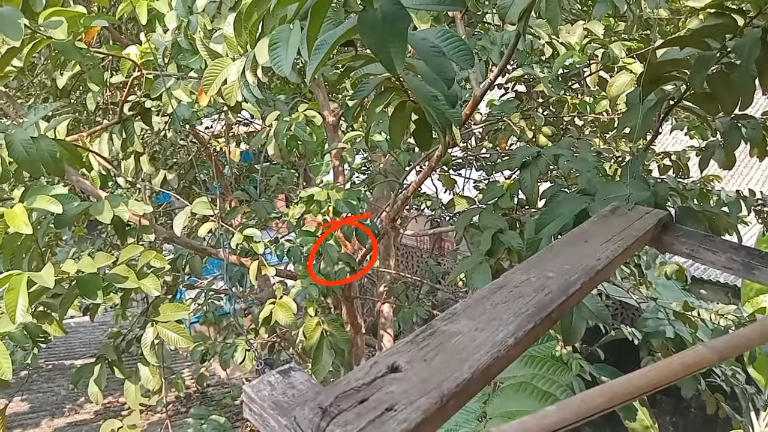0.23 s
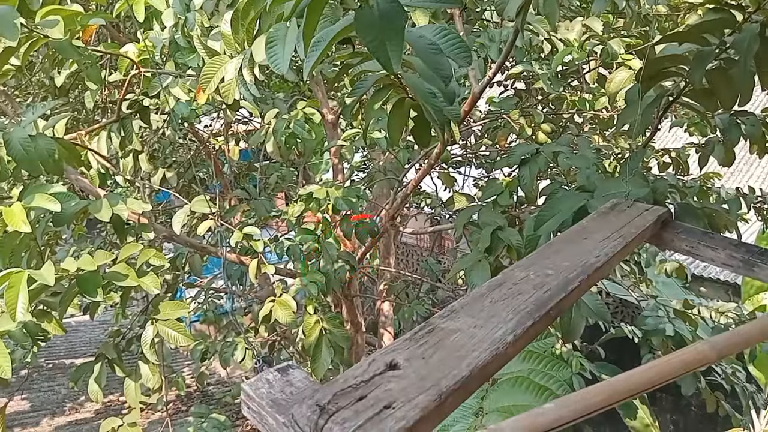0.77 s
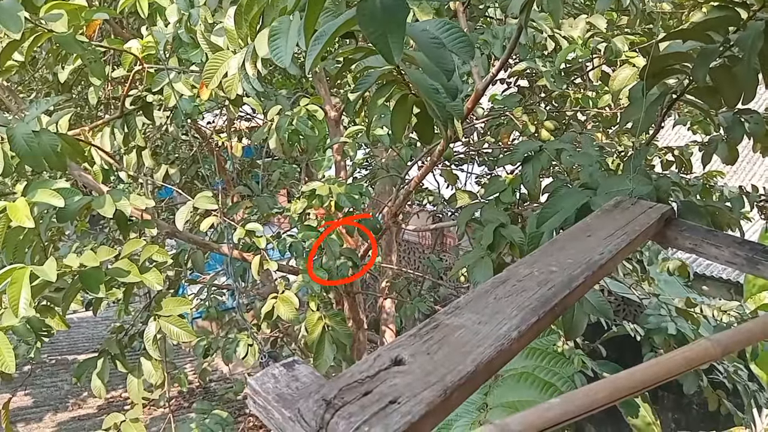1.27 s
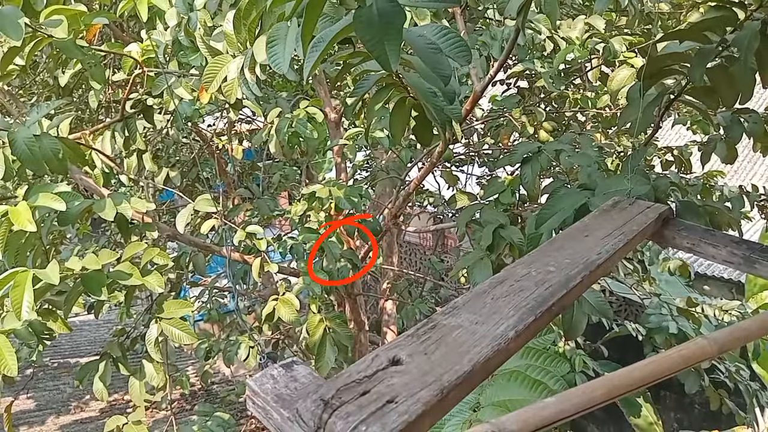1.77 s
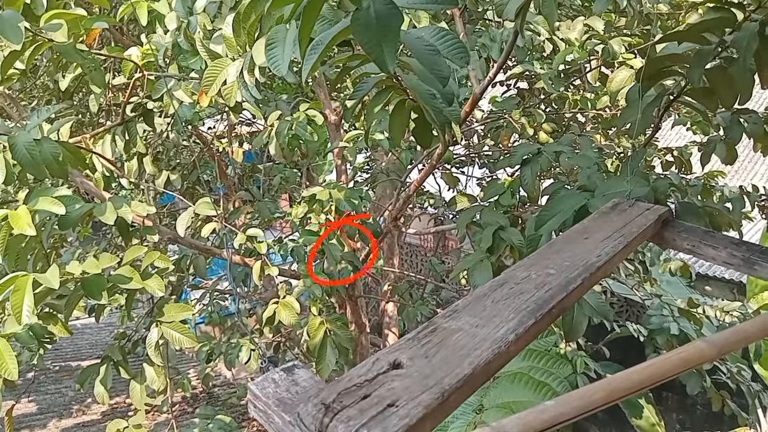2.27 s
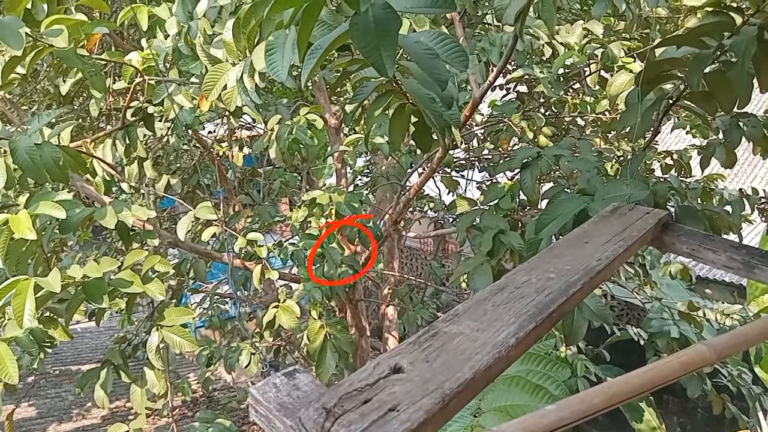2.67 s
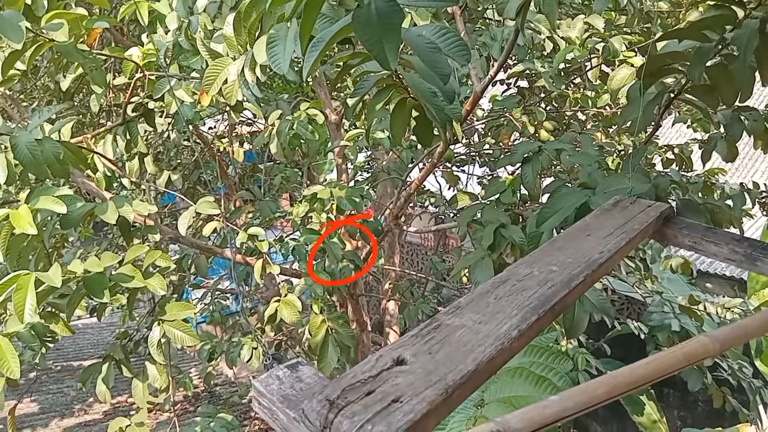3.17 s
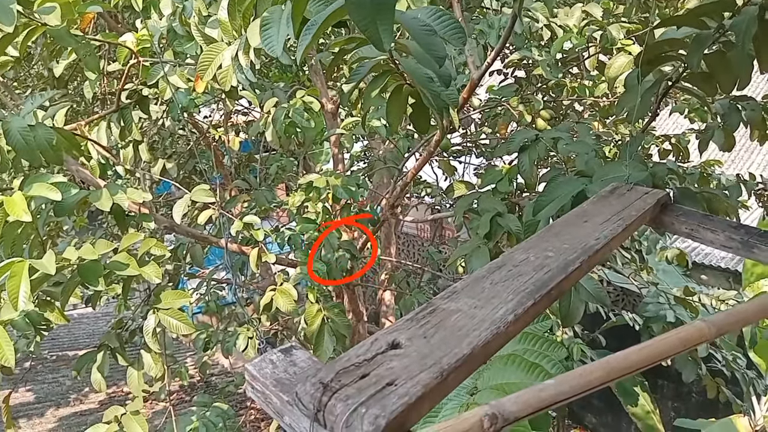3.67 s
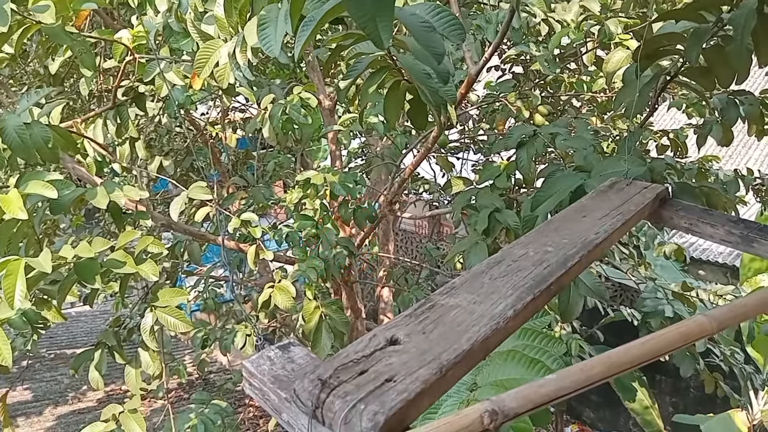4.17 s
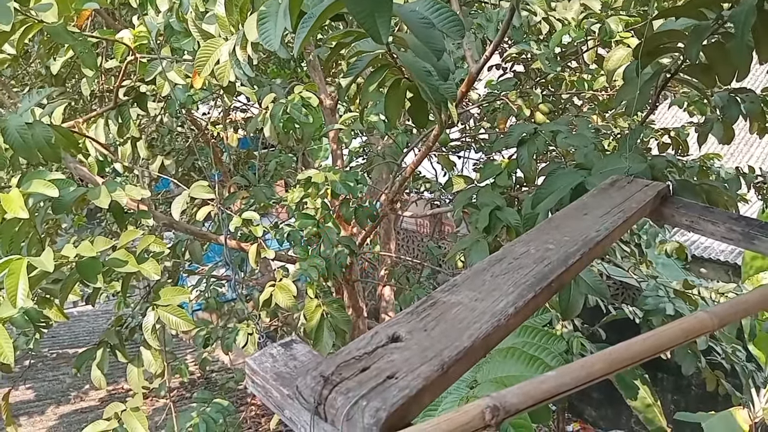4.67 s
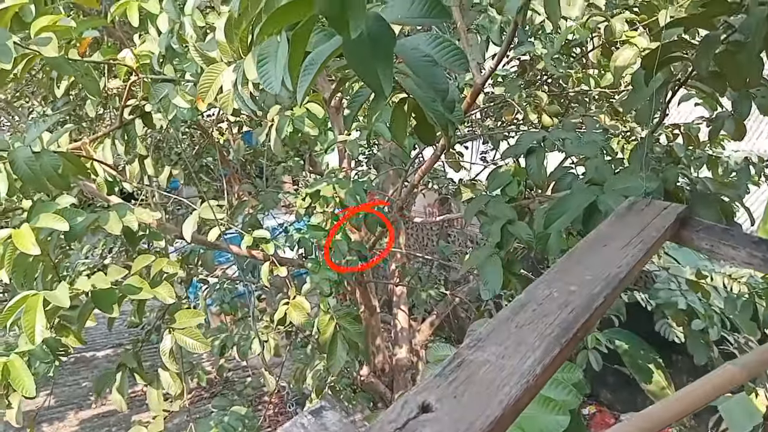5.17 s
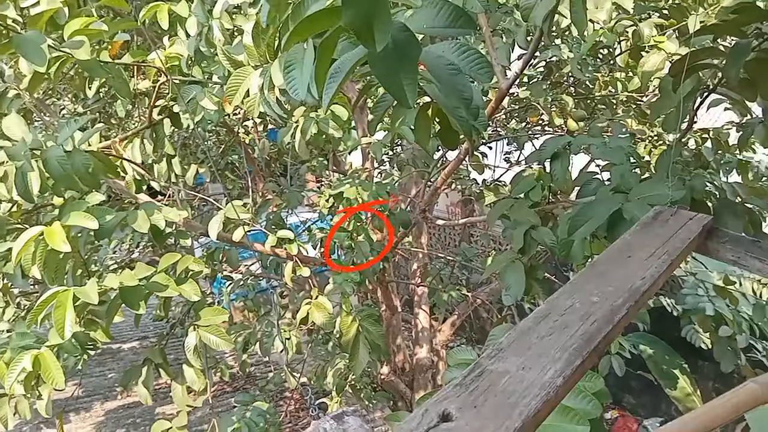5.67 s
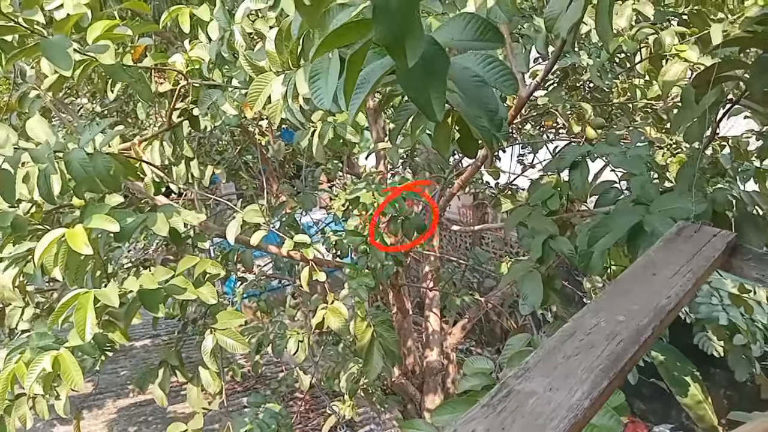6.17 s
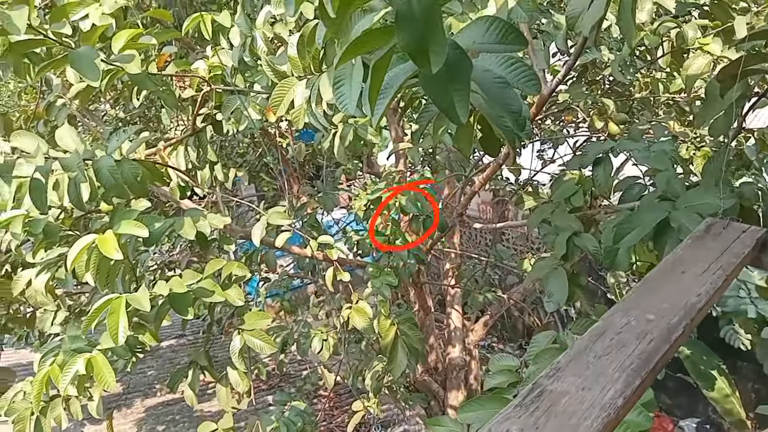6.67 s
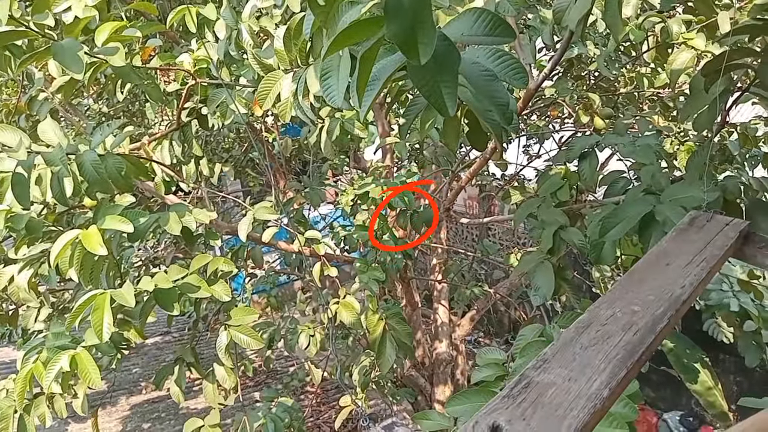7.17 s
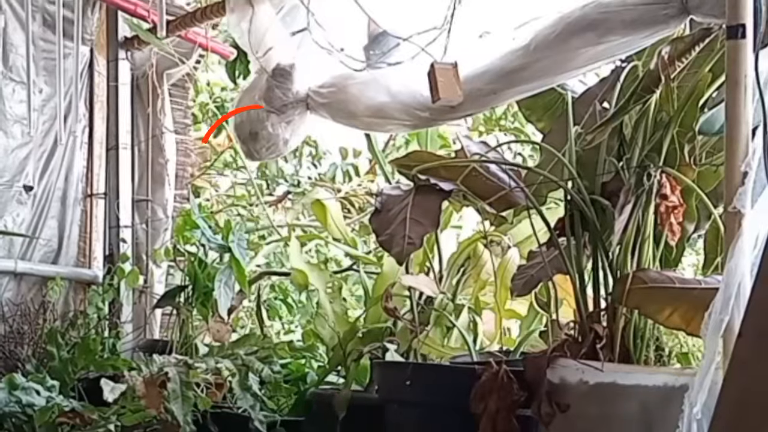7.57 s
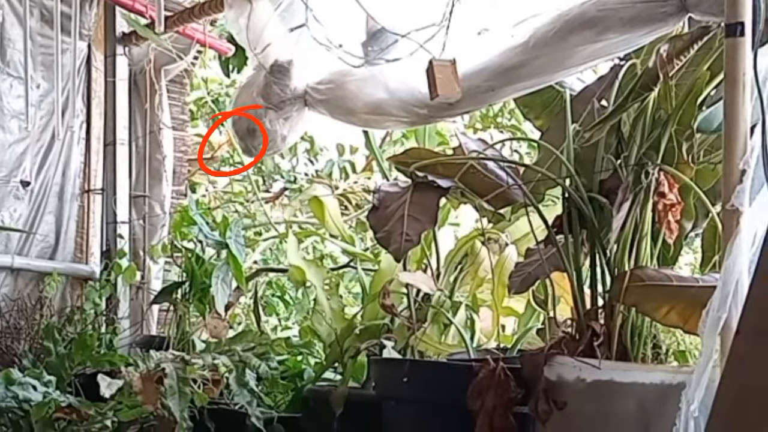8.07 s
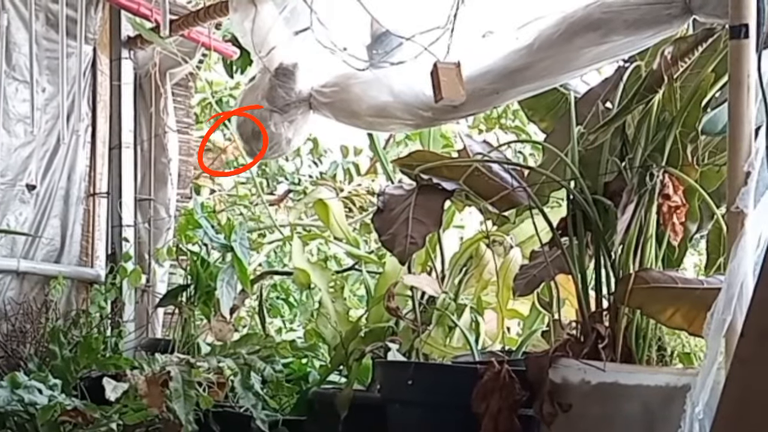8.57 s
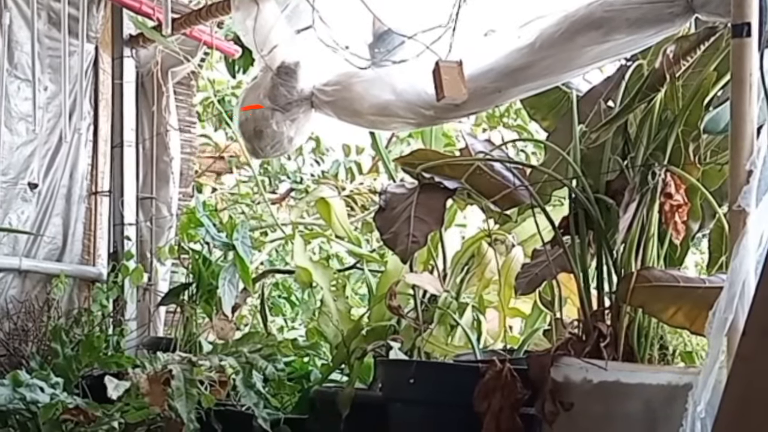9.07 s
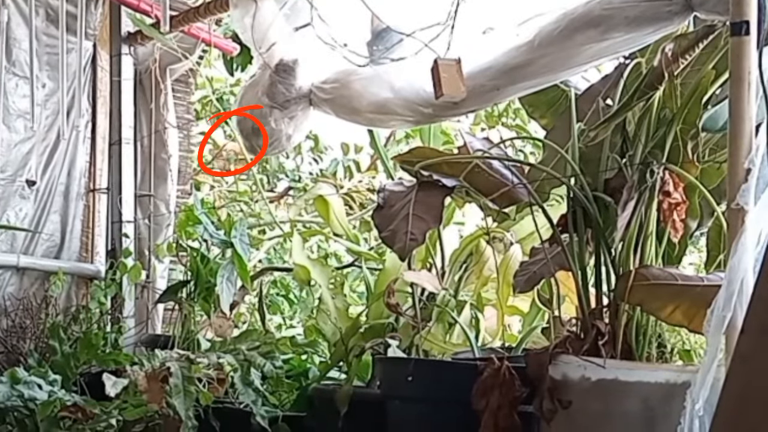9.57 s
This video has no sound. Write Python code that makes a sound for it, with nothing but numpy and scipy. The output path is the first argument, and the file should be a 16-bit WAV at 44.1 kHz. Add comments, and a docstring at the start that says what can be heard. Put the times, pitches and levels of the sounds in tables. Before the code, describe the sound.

Outdoors, a chicken cackles steadily over faint wind and leaf rustle, falls quiet while a small bird twitters, then resumes and turns distant.

```python
"""A hen clucks and squawks in a leafy yard: syrinx pulses and breath through a moving throat, echoed by the house walls.
All along, bands of noise make the wind's rumble on the microphone, the leaf hiss and faint traffic.
Dull far calls (hoarse noise) come first; at 4.8 s a tiny dropout opens a lull with a fluttering sine as a small bird's
twitter and faint narrow noise tones, then the hen returns at 6.1 s. At 7.4 s comes a cut to silence; from 7.7 s the hen
fades in as heard from a porch, farther away, with a low hum nearby. One dull call sounds near the end."""
import sys
import numpy as np
from scipy import signal
from scipy.io import wavfile
from scipy.ndimage import uniform_filter1d

SR = 44100
rng = np.random.default_rng(int(sys.argv[2]) if len(sys.argv) > 2 else 0)


def master(y):
    """Save y as 16-bit WAV."""
    cut = np.clip(np.atleast_2d(y).T, -1, 1)
    pcm = np.round(cut * 32767)  # scale
    wavfile.write(sys.argv[1], SR, pcm.astype(np.int16))


N = 433503

# clucks: start t/s, attack t/s, length t/s, level/dB, swell across the hold/dB, first f/Hz, top f/Hz,
# fundamental, upper, beak and treble level/dB re level (CLUCK_TONE adds to these), throb 0-1, gape/dB, release t/s
CLUCKS = [ (0.685, 0.017, 0.055, -29.5, -1.5, 427, 423.6, -10, -5.5, -9, -12.5, 0.41, -6, 0.013),
          (0.88, 0.036, 0.057, -24, -10, 475.7, 581, -19.5, -7.5, -16, -14.5, 0.59, 1, 0.01),
          (1.334, 0.008, 0.053, -22.5, -1.5, 558, 611.5, -17.5, -7, -10.5, -12.5, 0.39, -8, 0.018),
          (1.538, 0.018, 0.066, -24.5, -0.5, 480.7, 626.4, -17, -10.5, -11, -13, 1, 0.1, 0.021),
          (1.759, 0.01, 0.055, -25.5, 1, 479, 574.4, -18, -14, -5.5, -15, 0.47, 10, 0.017),
          (1.959, 0.013, 0.072, -26.5, -2, 446.3, 593, -17, -13.5, -5, -14, 0.83, 7, 0.023),
          (2.15, 0.014, 0.06, -26, 4, 475, 570, -16, -13, -5, -16, 0.87, 2, 0.019),
          (2.37, 0.0074, 0.064, -24.5, 0.5, 599.4, 559.8, -19.5, -11, -7, -11.5, 0.47, -14, 0.02),
          (2.582, 0.0082, 0.066, -26.5, 3.5, 471.5, 597, -16.5, -8.5, -5.5, -11, 0.73, 2, 0.026),
          (3.064, 0.02, 0.062, -22, 1.5, 519, 574.4, -14.5, -13.5, -8.5, -15.5, 0.74, -2.5, 0.023),
          (3.259, 0.014, 0.058, -23, -0.5, 532, 566.4, -18, -13, -14, -18, 0.34, -0.5, 0.018),
          (3.834, 0.012, 0.051, -28.5, 4, 478, 498.3, -14, -27, -4, -15, 0.63, 9, 0.014),
          (4.012, 0.025, 0.067, -23.5, -2.5, 579.2, 566, -18.5, -12, -6, -13, 0.51, -4.5, 0.017),
          (4.451, 0.027, 0.064, -22.5, -3, 617, 603, -17, -10, -12, -14, 0.52, -3.5, 0.022),
          (4.665, 0.0078, 0.057, -22.5, 4.5, 609, 604.6, -16.5, -7, -8, -11.5, 0.49, -3.5, 0.021),
          (6.148, 0.0092, 0.052, -31, -1, 446.3, 465.7, -11.5, -10, -4.5, -8.5, 0.67, 16, 0.021),
          (6.561, 0.0073, 0.052, -25.5, 2, 539.5, 580, -13, -10.5, -16, -11.5, 0.67, -5.5, 0.022),
          (6.759, 0.012, 0.055, -27.5, 0.5, 538.1, 590, -13.5, -11, -14, -12, 0.753, -10.5, 0.015),
          (7.024, 0.012, 0.056, -26, 0.5, 470, 570, -13, -14, -13.5, -15.5, 0.43, 2.5, 0.018),
          (7.227, 0.0088, 0.064, -26, 1, 545.6, 587, -14.5, -12, -13, -14.5, 0.81, -5, 0.018),
          (7.818, 0.021, 0.057, -36, -3, 453.4, 460, -18.5, -8.5, -13.5, -14.5, 0.32, 1, 0.022),
          (8.019, 0.01, 0.062, -34, 2, 610, 560.6, -11.5, -9, -14, -14, 0.62, 5.5, 0.023),
          (8.434, 0.0091, 0.055, -35.5, -1, 530.2, 518.6, -15, -8, -16, -14, 0.31, 0.1, 0.023),
          (8.964, 0.014, 0.061, -39, -4.5, 460.6, 461.6, -20, -14.5, -25, -15, 0.42, -5, 0.022),
          (9.144, 0.0099, 0.061, -35, -1, 518.6, 541.7, -12.5, -12, -12, -8.5, 0.22, 5, 0.02),
          (9.652, 0.014, 0.055, -32, 2, 497.5, 590, -14, -10.5, -11, -17, 0.59, -4.5, 0.023), ]
# tone moves of every cluck, rows at start, end of attack, end of hold, end:
# fundamental, upper, beak, treble level/dB
CLUCK_TONE = [(3, -6.5, 2.5, -0.5), (1, -3.5, -1.5, 0), (4.5, -2, -4.5, -0.5), (-2.5, 6, 1.5, 16.5)]
# squawks, one curve each: t/s, level/dB, f/Hz, fundamental and upper level/dB re level
SQUAWKS = [
    [(0.945, -29.5, 639, -8.5, -7), (0.961, -23, 650, -7.5, -6.5), (1.007, -24.5, 614, -9, -20),
     (1.035, -23, 613, -13, -5), (1.069, -23, 615.5, -12, -23), (1.087, -26, 621, -4, -3.5),
     (1.095, -22.5, 618, -20, -33), (1.125, -34.5, 612, -20, -18)],
    [(2.66, -41.5, 628, -15, -24), (2.67, -23.5, 626, -7.5, -3), (2.686, -20, 641.6, -9.5, -9.5),
     (2.73, -23, 640.6, -6, 2.5), (2.748, -21, 633.6, -8, -11), (2.778, -21, 635.2, -11.5, 1.5),
     (2.798, -30.5, 619.5, -12, -11), (2.825, -35.5, 630, -17, -4)],
    [(4.075, -38.5, 624, 6, -8), (4.079, -21.5, 622.5, -8.5, -10), (4.097, -23.5, 634.3, -5.5, -2),
     (4.153, -24.5, 628, -6.5, -5), (4.165, -19.5, 634, -15, -24), (4.201, -24.5, 639.4, -2, -12),
     (4.231, -23, 652.4, -19, -12), (4.255, -38.5, 637.5, -6, -8)],
    [(6.215, -59, 629, 1, -8), (6.227, -25.5, 645, -2.5, -5), (6.243, -21.5, 647.6, -16.5, -20),
     (6.295, -25, 621.5, -4.5, -10), (6.325, -20.5, 619, -12, -15.5), (6.379, -25, 626.3, -5, -8.5),
     (6.385, -23, 630.7, -12, -23), (6.415, -36.5, 618, -12, -9)],
    [(8.085, -49, 644, 2, -8), (8.097, -34, 646.6, -6.5, -2), (8.127, -39.5, 649.6, -18, 2.5),
     (8.137, -47, 647.2, -1, 8), (8.173, -37.5, 638, -9, -17), (8.185, -42, 640.5, -5, 5),
     (8.215, -32.5, 651, -13, -27), (8.26, -48, 643, -13, -19)],
    [(9.21, -54, 626, -3, -5), (9.226, -31, 648, -15, -1), (9.244, -37.5, 643.6, -3, -7),
     (9.274, -34.5, 646, -16, -24), (9.284, -34, 634.6, -7, -2), (9.306, -26.5, 643.7, -25, -20),
     (9.332, -30.5, 629, -6.5, -6.5), (9.36, -38, 608, -20, -18)],
]
# top end of each squawk: beak and treble level/dB re level, dulling from start to end/dB,
# throb 0-1 (more where the voice cracks), gape/dB
SQUAWK_TONES = [(-10.5, -8.5, 3.5, 0.81, -1), (-17, -10, 0.1, 0.08, 1.5), (-8, -10, 4.8, 0.6, 2),
                (-12.5, -11, 1.87, 0.74, 6), (-16.5, -8.5, 4.4, 0.065, -3), (-13.5, -11, 5.6, 0.032, -0.5)]
# windpipe and beak resonances: f/Hz, width of one pass/Hz, relative level/dB in the yard, at the porch
THROAT = [(567.5, 864, -9.5, -23.5), (1144.6, 220, 5.5, 3), (1405, 73, -11, 8), (1880, 2200, -16.5, -9.5),
          (2354, 540, -2.5, 2), (3506, 380, -4.5, 2), (4608, 1000, -14.5, -20), (5200, 540, -21, -17),
          (6450, 1100, -18.5, -17), (8870, 2300, -17.5, -17.5), (15100, 1700, -26.5, -72)]
# dull far calls: start t/s, length t/s, level/dB, centre f/Hz
FAR_CALLS = [(0.08, 0.1, -42, 770), (0.334, 0.22, -44.5, 760), (5.36, 0.23, -61.5, 376),
             (9.54, 0.12, -52.5, 1950)]
# a small bird far off: start t/s, length t/s, level/dB, f/Hz
TWITTER = [(4.773, 0.15, -57, 2916), (4.942, 0.15, -63.5, 2900), (5.128, 0.14, -54.5, 2755),
           (5.269, 0.26, -62, 2815), (5.515, 0.15, -59.5, 2675), (5.717, 0.093, -56.5, 2690),
           (5.829, 0.11, -62, 2750), (6.018, 0.073, -63, 2820)]
# faint narrow noise tones in the lull: f/Hz, width of one pass/Hz, level/dB
FAINT_TONES = [(1582, 60, -87), (2000, 77, -82), (3916, 180, -77.5)]
# wind strength, one curve for the yard, one for the porch: t/s, level/dB
GUSTS = [
    [(0.0, -86), (1.22, -59), (1.33, -73), (1.57, -69), (1.61, -60), (1.9, -87), (2.2, -63), (2.3, -84),
     (3.29, -62.5), (3.37, -78.5), (3.65, -72.5), (4.55, -85), (4.96, -67.5), (7.33, -77.5)],
    [(7.92, -77), (7.978, -62), (8.356, -86), (8.568, -61), (8.606, -92.5), (8.718, -63), (8.818, -99.5),
     (8.834, -76), (9.222, -62.5), (9.488, -84), (9.552, -65), (9.642, -78), (9.798, -74), (9.83, -86)],
]
# wind colour: f/Hz, relative level/dB per Hz
WIND_SPECTRUM = [(12, -52.5), (20, 0.5), (43, -1.5), (57, 5.5), (86, -12), (120, 1.5), (160, -35),
                 (260, -120)]
# leaf movement, one curve for the yard, one for the porch: t/s, high leaf level/dB, low leaf level/dB
RUSTLE = [
    [(0.0, -52.5, -60), (0.14, -51.5, -55.5), (0.72, -57.5, -66.5), (0.91, -60, -53.5), (1.05, -57.5, -59),
     (1.27, -60, -55.5), (1.89, -61.5, -69.5), (2.66, -56, -52.5), (2.92, -55, -55.5), (3.23, -53.5, -59.5),
     (3.43, -61, -61.5), (3.77, -59, -67), (4.09, -60.5, -67), (4.19, -49.5, -68), (4.51, -74, -68),
     (4.66, -56.5, -59), (4.98, -61, -70.5), (5.58, -56, -68.5), (6.15, -62, -72), (6.31, -38.5, -52),
     (6.57, -67.5, -66.5), (6.85, -60.5, -64), (7.2, -59, -51.5), (7.24, -59.5, -62)],
    [(7.92, -56, -68), (7.994, -63, -60), (8.084, -58, -53), (8.594, -59.5, -78), (8.77, -60, -64.5),
     (9.282, -54.5, -56.5), (9.462, -57, -64.5), (9.712, -66.5, -56), (9.83, -59.5, -72)],
]
# colour of the high leaf hiss: f/Hz, relative level/dB per Hz
LEAF_SPECTRUM = [(4500, -6), (6000, -2.5), (7800, 3.5), (9500, -13.5), (10500, 11), (11500, -18),
                 (13000, -23), (16000, -34)]
# colour of the low leaf rustle: f/Hz, relative level/dB per Hz
LOW_LEAF_SPECTRUM = [(1400, -20), (1900, -10), (2700, -7), (3600, -10), (4600, -5)]
# colour of the distant traffic: f/Hz, relative level/dB per Hz
TRAFFIC_SPECTRUM = [(53, -37.5), (90, -7), (231, -14.5), (370, -17), (451, -9), (1230, -24.5), (1500, -31),
                    (1950, -48), (3300, -120)]
# low hum by the porch: f/Hz, width of one pass/Hz, level/dB
HUM = [(162.3, 36, -67), (338, 45, -65.5), (571, 47, -74), (870, 27, -93)]

DROPOUT_S, LULL_END_S, CUT_S, PORCH_S = 4.776, 6.14, 7.384, 7.675
FADE_IN_S, CUTOFF_HZ = .22, 15700
CLUCK_START_DB, CLUCK_END_DB = -20.5, -23  # outer edges, re the hold's near end
CLUCK_GLIDE_SHARE = .6  # part of the length the pitch takes to reach its top
CLUCK_SAG_SHARE = .1  # part of the top pitch lost by the end
BEAK_MOVES_DB = 3  # spread of each resonance's swelling and fading
GAPE_RESONANCE = 2  # index of the throat resonance that grows as the beak gapes
FAR_ATTACK_S, FAR_EDGE_DB = 0.063, -28
TWITTER_ATTACK_S, TWITTER_EDGE_DB = 0.026, -14
TRAFFIC_DB, LULL_DB, PORCH_TRAFFIC_DB = -70.5, -6, 1.5  # the last two are offsets to the first


def hen():
    """Short clucks throb freely; longer squawks hold steadier and crack at their edges."""
    clucks = voice([cluck(*row) for row in CLUCKS], crack=0, full_throb_jitter_rad=.2,
                   push_jitter_rad=.5, breath_db=-7, tilt=.3, wobble=.015)
    squawks = voice(list(map(squawk, SQUAWKS, SQUAWK_TONES)), crack=.7, full_throb_jitter_rad=.13,
                    push_jitter_rad=.2, breath_db=-4, tilt=.3, wobble=.0015)
    return clucks + squawks


def cluck(start, attack, length, level_db, swell_db, first_hz, top_hz,
          low_db, upper_db, beak_db, treble_db, throb, gape_db, release):
    """Attack, hold and release; the pitch glides to its top and sags."""
    corners = np.array([0, attack, length - release, length])
    top = CLUCK_GLIDE_SHARE * length
    s = np.sort(np.append(corners, top))
    envelope_db = [CLUCK_START_DB - swell_db / 2, -swell_db / 2, swell_db / 2, CLUCK_END_DB + swell_db / 2]
    loud_db = np.interp(s, corners, level_db + np.array(envelope_db))
    pitch_hz = np.interp(s, [0, top, length], [first_hz, top_hz, top_hz * (1 - CLUCK_SAG_SHARE)])
    tones = np.array(CLUCK_TONE) + [low_db, upper_db, beak_db, treble_db]
    tone_db = [np.interp(s, corners, db) for db in tones.T]
    return [(*row, throb, gape_db) for row in zip(start + s, loud_db, pitch_hz, *tone_db)]


def squawk(curve, tone):
    """Level, pitch and lower partials follow the curve; the top dulls steadily."""
    beak_db, treble_db, dulling_db, throb, gape_db = tone
    start, end = curve[0][0], curve[-1][0]
    bright_db = [dulling_db * (.5 - (row[0] - start) / (end - start)) for row in curve]
    return [(*row, beak_db + db, treble_db + db, throb, gape_db) for row, db in zip(curve, bright_db)]


def voice(calls, crack, full_throb_jitter_rad, push_jitter_rad, breath_db, tilt, wobble):
    """The syrinx drives the moving throat; five bands are then levelled and set to the call's tone."""
    curves = in_time(sorted(row for call in calls for row in call))
    level_db, pitch_hz, low_db, upper_db, beak_db, treble_db, throb, gape_db = curves
    long_calls = [c for c in calls if c[-1][0] - c[0][0] > .1]
    steady = sounding([[(c[0][0] + .04,), (c[-1][0] - .055,)] for c in long_calls], .02)
    throb = np.maximum(throb, crack * (1 - steady))  # the voice cracks as it starts and stops
    source = syrinx(pitch_hz, throb, full_throb_jitter_rad, push_jitter_rad + 1 - steady,
                    breath_db, tilt, wobble)
    throaty = throat(source, gape_db)
    parts = [(350, 850, low_db), (850, 1720, 0), (1720, 2800, upper_db),
             (3100, 3950, beak_db), (4200, 18000, treble_db)]  # low Hz, high Hz, dB
    toned = sum(from_db(db) * evened(band(throaty, low, high, order=3), 0.016) for low, high, db in parts)
    return from_db(level_db) * sounding(calls, .005) * toned


def syrinx(pitch_hz, throb, full_throb_jitter_rad, push_jitter_rad, breath_db, tilt, wobble):
    """Membranes pulse at the pitch, every fourth pulse pushed harder by the throb, and leak breath."""
    phase = 2 * np.pi * np.cumsum(pitch_hz * (1 + wobble * drift(50))) / SR
    # throbbing unsettles the timing
    shaky = phase + throb * (full_throb_jitter_rad * drift(250) + .2 * np.sin(phase / 4))
    # the k * k phase smears each pulse, so it is no sharp click
    pulses = sum(np.cos(k * shaky + .3 * k * k) / k ** tilt for k in range(1, 21))
    count = np.floor((phase + push_jitter_rad * drift(60)) / (8 * np.pi))
    fourth = np.diff(count, prepend=0) * 2 * SR / pitch_hz  # scaled for partials of height one
    air = (1 + .5 * np.cos(phase)) * rng.standard_normal(N)  # more air while the membranes are open
    breath = from_db(breath_db) * band(air, 2600, 18000, order=1)
    return pulses + throb * band(fourth, 1025, 1780) + breath


def throat(source, gape_db):
    """Windpipe and beak resonances in parallel, signs alternating, each drifting in strength."""
    porch = np.arange(N) > PORCH_S * SR
    out = 0
    for k, (hz, width_hz, yard_db, porch_db) in enumerate(THROAT):
        place_db = np.where(porch, porch_db, yard_db)
        gain = from_db(place_db + BEAK_MOVES_DB * drift(12) + gape_db * (k == GAPE_RESONANCE))
        out = out + (-1) ** k * gain * twice_resonant(source, hz, width_hz)
    return out


def hen_echoes(dry_hen, t):
    """The yard's brighter tail and the porch's duller, stronger one; the dropout ends the first tail."""
    porch = t > CUT_S
    yard_echo = echoes(dry_hen * ~porch, t60_s=0.3, dull_hz=5070, gap_s=0.0042)
    yard_echo = yard_echo * ((t < DROPOUT_S) | (t > 6))
    porch_echo = echoes(dry_hen * porch, t60_s=0.31, dull_hz=4430, gap_s=0.0045)
    return from_db(-17) * yard_echo + from_db(-12.0) * porch_echo


def echoes(x, t60_s, dull_hz, gap_s):
    """Walls and foliage return a dense dying tail after a short gap."""
    t = np.arange(SR) / SR
    tail = rng.standard_normal(SR) * from_db(-60 * t / t60_s) * (t > gap_s)
    tail = band(tail, 650, dull_hz, order=1)
    return signal.fftconvolve(x, tail / np.sqrt(np.sum(tail ** 2)))[:N]


def far_calls():
    """Hoarse, dull calls from far away: noise in one broad resonance."""
    out = 0
    for row in FAR_CALLS:
        call = note(*row, FAR_ATTACK_S, FAR_EDGE_DB)
        level_db, hz = in_time(call)[0], np.mean(call, axis=0)[2]
        hoarse = twice_resonant(rng.standard_normal(N), hz, 0.24 * hz)
        out = out + from_db(level_db) * sounding([call], 0.15) * rms_one(hoarse)
    return out


def twitter():
    """A thin, husky whistle: a sine with fast random flutter."""
    notes = [note(*row, TWITTER_ATTACK_S, TWITTER_EDGE_DB) for row in TWITTER]
    level_db, pitch_hz = in_time(sorted(row for n in notes for row in n))
    whistle = drift(70) * np.sin(2 * np.pi * np.cumsum(pitch_hz) / SR)
    return from_db(level_db) * sounding(notes, 0.027) * rms_one(whistle)


def note(start, length, level_db, hz, attack_s, edge_db):
    """A rise and a fade to the end on one pitch, as rows of time, level and pitch."""
    edge = level_db + edge_db
    return [(start, edge, hz), (start + attack_s, level_db, hz), (start + length, edge, hz)]


def faint_tones(lull):
    """Faint narrow noise tones that come and go in the lull."""
    return lull * wavering(FAINT_TONES, waver_db=6.5, waver_hz=2.2)


def wind():
    """Gusts rumble on the microphone as patchy low noise."""
    gust_db, = in_time(GUSTS[0] + GUSTS[1])
    return from_db(gust_db) * patchy_noise(WIND_SPECTRUM, patchy_db=-2.0, flicker_hz=8)


def leaves():
    """Leaves hiss high and rustle lower, each layer on its own level curve."""
    high_db, low_db = in_time(RUSTLE[0] + RUSTLE[1])
    high = from_db(high_db) * patchy_noise(LEAF_SPECTRUM, patchy_db=4.5, flicker_hz=13)
    low = from_db(low_db) * patchy_noise(LOW_LEAF_SPECTRUM, patchy_db=5.0, flicker_hz=16.0)
    return high + low


def traffic(lull, porch):
    """Distant traffic blurs into a murmur, quieter in the lull and a little louder at the porch."""
    level_db = TRAFFIC_DB + LULL_DB * lull + PORCH_TRAFFIC_DB * porch
    return from_db(level_db) * patchy_noise(TRAFFIC_SPECTRUM, patchy_db=2.5, flicker_hz=9)


def hum_nearby(porch):
    """A low hum at the porch: narrow noise bands that waver slightly."""
    return porch * wavering(HUM, waver_db=1.5, waver_hz=2.63)


def patchy_noise(spectrum, patchy_db, flicker_hz):
    """Third-octave noise bands that swell partly together and partly alone; rms 1."""
    hz, density_db = np.array(spectrum).T
    together = drift(flicker_hz / 2)
    white, out = rng.standard_normal((2, N)), 0
    edges = hz[0] * 2 ** np.arange(0, np.log2(hz[-1] / hz[0]) - .1, 1 / 3)
    for k, low in enumerate(edges):
        level_db = np.interp(np.log(low * 2 ** (1 / 6)), np.log(hz), density_db)  # at the band's centre
        gain = from_db(level_db + patchy_db * (0.78 * together + drift(flicker_hz)))
        out = out + gain * band(white[k % 2], low, low * 2 ** (1 / 3))
    return rms_one(out)


def wavering(peaks, waver_db, waver_hz):
    """Narrow noise bands of set level, each swelling and fading on its own."""
    out = 0
    for hz, width_hz, db in peaks:
        gain = from_db(db + waver_db * drift(waver_hz))
        out = out + gain * rms_one(twice_resonant(rng.standard_normal(N), hz, width_hz))
    return out


def twice_resonant(x, hz, width_hz):
    """The same resonance passed twice, for steeper flanks."""
    return resonance(resonance(x, hz, width_hz), hz, width_hz)


def resonance(x, hz, width_hz):
    """Two-pole peak of gain about 1."""
    r = np.exp(-np.pi * width_hz / SR)
    zeros = np.array([1, 0, -1]) * (1 - r * r) / 2
    return signal.lfilter(zeros, [1, -2 * r * np.cos(2 * np.pi * hz / SR), r * r], x)


def band(x, low_hz, high_hz, order=2):
    """Butterworth band-pass."""
    return signal.sosfilt(signal.butter(order, [low_hz, high_hz], "band", fs=SR, output="sos"), x)


def drift(hz):
    """Smooth random motion of spread 1: noise through two equal poles at every 16th sample."""
    r = np.exp(-32 * np.pi * hz / SR)
    noise = rng.standard_normal(N // 16 + 3002)
    slow = signal.lfilter([1], [1, -2 * r, r * r], noise)[3000:]  # drop the filter's run-in
    return np.interp(np.arange(N) / 16, np.arange(len(slow)), rms_one(slow))


def evened(x, window_s):
    """Unit running level, so that a curve can set the loudness."""
    return x / np.sqrt(uniform_filter1d(x ** 2, max(round(window_s * SR), 1)) + 1e-12)


def sounding(calls, fade_s):
    """One while a call lasts, with short fades outside it, zero between calls."""
    t, gate = np.arange(N) / SR, 0
    for call in calls:
        start, end = call[0][0], call[-1][0]
        gate = gate + np.interp(t, [start - fade_s, start, end, end + fade_s], [0, 1, 1, 0])
    return np.minimum(1, gate)


def in_time(rows):
    """Columns of a table as curves over all samples; the first column is time in seconds."""
    s, *columns = np.transpose(rows)
    return [np.interp(np.arange(N) / SR, s, c) for c in columns]


def rms_one(x):
    """Scale to unit rms."""
    return x / np.sqrt(np.mean(x ** 2) + 1e-20)


def from_db(db):
    """Decibels to gain."""
    return 10 ** (np.asarray(db) / 20)


def scene():
    """Mix the hen and her echoes over far calls, twitter, faint tones, wind, leaves, traffic and hum."""
    t = np.arange(N) / SR
    lull = (t >= DROPOUT_S) & (t < LULL_END_S)
    porch = t > CUT_S
    dry_hen = hen()
    distant = far_calls() + twitter() + faint_tones(lull)
    background = wind() + leaves() + traffic(lull, porch) + hum_nearby(porch)
    return (dry_hen + hen_echoes(dry_hen, t) + distant + background)[None]


def record(dry):
    """A brief dropout, a cut to silence with a fade-in, and a steep low-pass over the whole."""
    t = np.arange(N) / SR
    dropout = np.interp(t, DROPOUT_S + np.array([-0.0031, -0.0027, 0.0027, 0.0054]), [1, 0, 0, 1])
    fade = np.where(t < CUT_S, 1, np.clip((t - PORCH_S) / FADE_IN_S, 0, 1))
    low_pass = signal.ellip(12, .5, 70, CUTOFF_HZ, fs=SR, output="sos")
    return signal.sosfilt(low_pass, dry * dropout * fade)


dry = scene()
out = record(dry)
master(out)
```